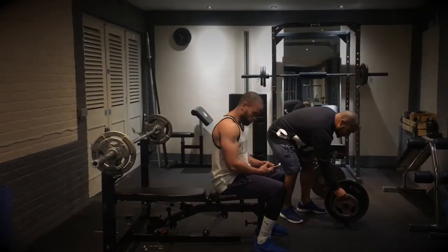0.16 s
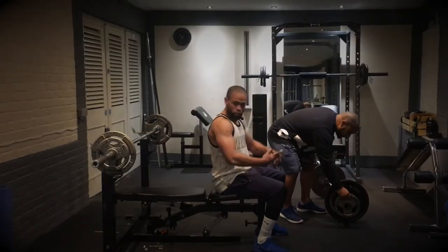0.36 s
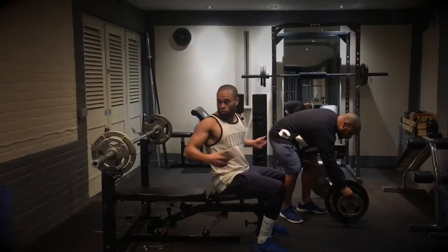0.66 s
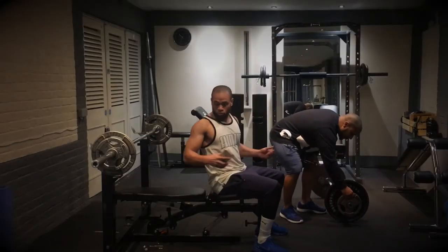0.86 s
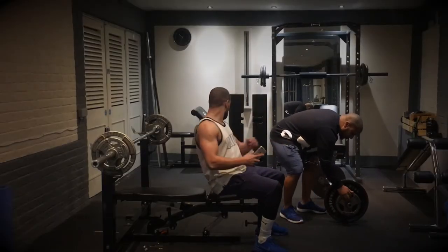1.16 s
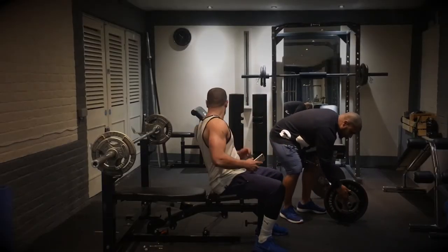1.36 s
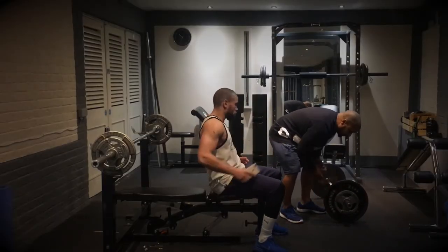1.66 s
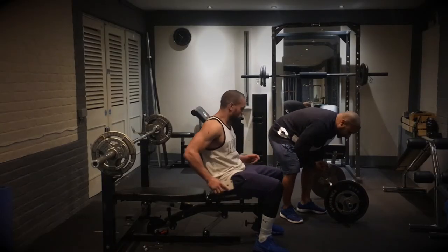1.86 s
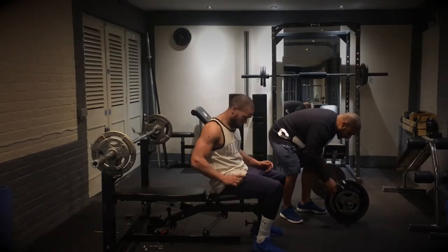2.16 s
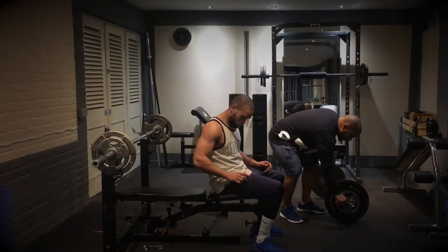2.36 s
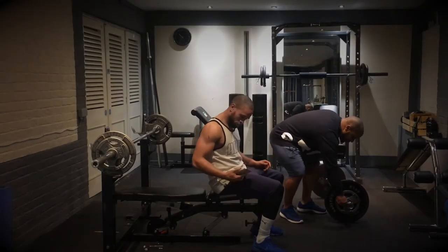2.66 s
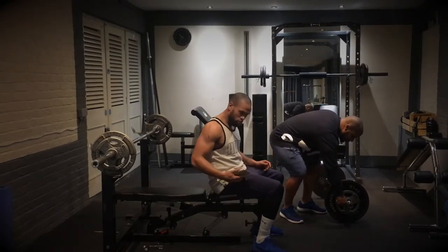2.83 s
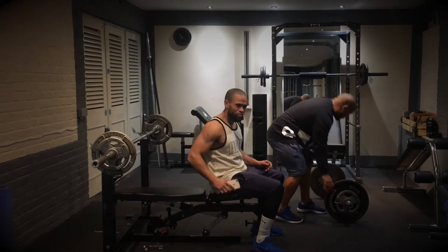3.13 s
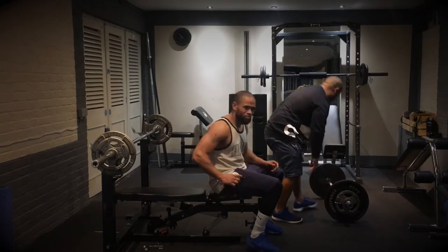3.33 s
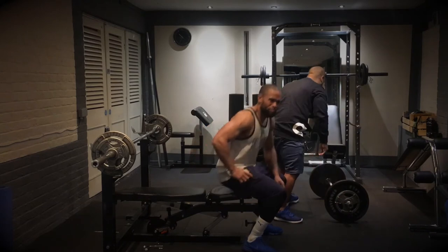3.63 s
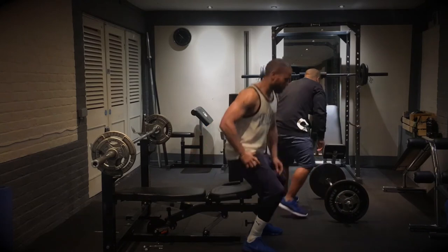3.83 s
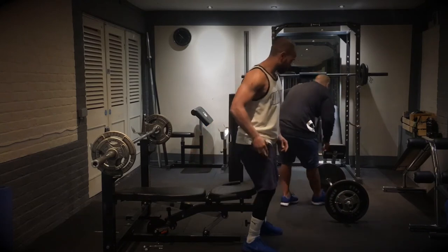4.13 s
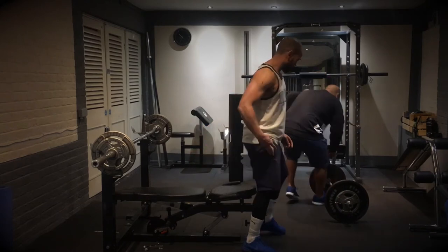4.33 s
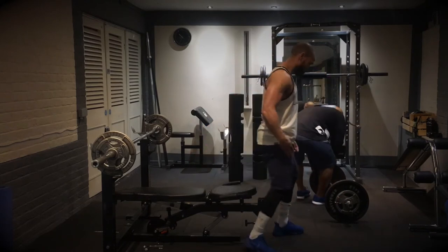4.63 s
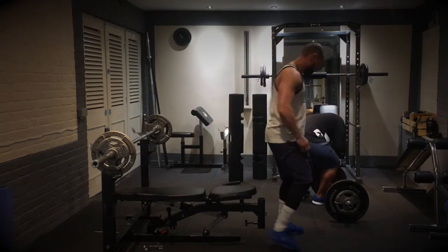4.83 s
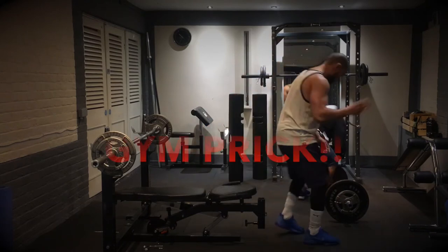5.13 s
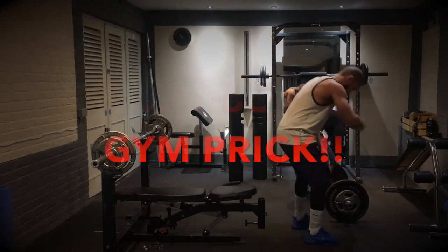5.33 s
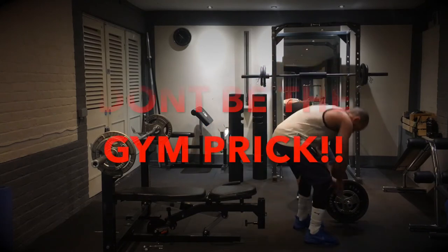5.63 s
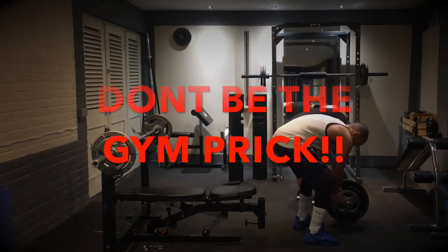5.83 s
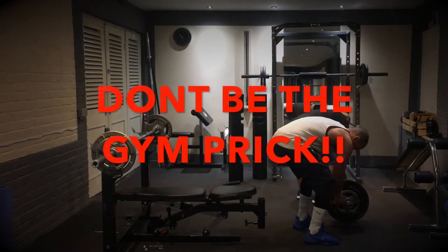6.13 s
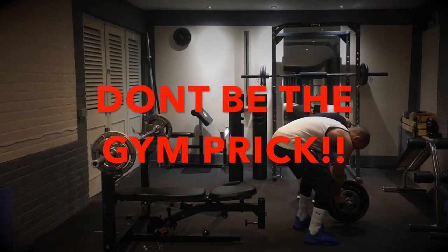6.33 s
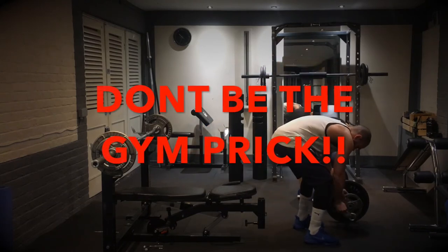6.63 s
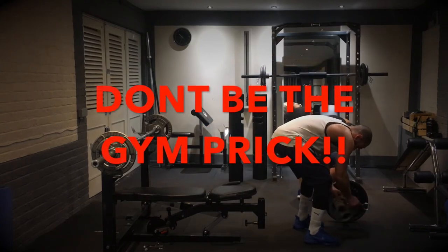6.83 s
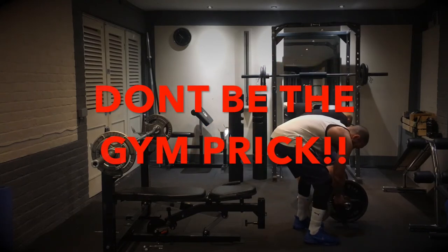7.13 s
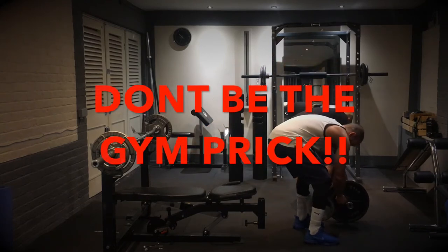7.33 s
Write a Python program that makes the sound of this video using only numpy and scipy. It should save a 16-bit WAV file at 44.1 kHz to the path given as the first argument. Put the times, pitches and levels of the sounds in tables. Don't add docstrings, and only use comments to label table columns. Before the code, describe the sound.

Distant cast-iron clanks in a bright hard-walled room: a knock, a ringing slam, small clicks, scrapes, then a loud ringing clunk over faint ventilation.

```python
import sys
import numpy as np
from scipy import signal
from scipy.fft import rfft, irfft, next_fast_len
from scipy.io import wavfile
from scipy.ndimage import uniform_filter1d

SR = 44100
rng = np.random.default_rng(int(sys.argv[2]) if len(sys.argv) > 2 else 0)


def unload_wav(signal):
    wavfile.write(
        sys.argv[1],
        SR,
        np.round(np.clip(np.atleast_2d(signal).T, -1, 1) * 32767).astype(np.int16),
    )


def boost_factor(decibels):
    exponent = np.asarray(decibels, float) / 20
    return 10 ** exponent


N = 329868
SIZE = 65536

# contacts (time [s], peak level [dB], contact length [s], treble share [dB]),
#   iron modes (frequency [Hz], level [dB], t60 [s]),
#   clatter spectrum (frequency [Hz], density [dB per Hz]),
#   level of ring over clatter [dB]
FIRST_KNOCK = ([(0.3025, -15.5, 0.012, -18)], [(2120, -21.0, 0.33), (2510, -8.5, .1), (2930, -14, 0.1),
                (3620, -14.5, 0.46), (4200, -4, 0.1), (4370, -35, 5.0), (5700, 4.5, 0.58),
                (6150, -5.0, 0.25), (8140, -34, 0.5)] + [(755, -10, 0.084), (1432, -15, 0.11)], [(59, -32),
                (100, -29.5), (229, -10), (406, -18.5), (691, -11.5), (1480, -17), (1680, -16.5),
                (4670, -18), (5650, -17), (16000, -41)], -3.5)
JIGGLE = ([(0.858, -37.5, 0.0092, -27.5), (0.942, -28.5, 0.041, -16.5), (0.9744, -33.5, 0.04, -19)],
           [(784, -10, 0.68), (1420, -15.5, 0.45), (2000, -13.5, 5.0), (2420, 0.5, 0.061), (3597, -14, 2.1),
           (4240, -12.5, 0.39), (6300, -19, 0.498), (7850, -20, 0.34)], [(180, -43), (300, -10.5),
           (624, -7.5), (842, -0.5), (1210, -8.5), (1510, 1.5), (1780, -18), (3580, -7), (4990, -20),
           (6410, -12), (16000, -54)], -9.5)
LIFT = ([(1.307, -32, 0.02, -8.5), (1.3374, -25.5, 0.035, -9.5)], [(1968, -11.5, 5.0), (6920, -9, 5.0),
         (8027, -24.5, 5.0)], [(290, -42), (500, -11.5), (1510, -8.5), (2430, -27), (3750, -11),
         (5310, -17), (16000, -43)], -10.5)
SLAM = ([(1.383, -8, 0.0027, -22), (1.405, -15, 0.0071, -14.5)] + [(1.64, -28.5, 0.039, -24)],
         [(3285, -24.5, 0.49), (3566, -1.0, 0.29), (4030, -21.0, 1.1), (4000, 3.5, 0.16),
         (4400, -21.5, 1.05), (5290, -38.5, 5.0), (6650, -15.5, 0.36),
         (8000, -20, 0.48)] + [(695, -10.5, 0.085), (790.5, 8.5, 0.2), (848, 2.5, 0.29), (1950, -14, 0.11),
         (2330, -20.0, .2)], [(59, -56), (110, -28.5), (280, -27), (634, -25.5), (818, -5.5), (1010, -23),
         (1500, -17), (1700, -25.5), (2170, -32), (2860, -22.5), (3050, -25), (6150, -31), (16000, -55)], -6)
CLIP_ON = ([(2.4897, -31, 0.004, -12)], [(2318, -8, 0.045), (2184, -18, 0.032), (3770, -15, 0.029),
            (4600, -5.5, 0.025), (6550, -4, 0.03), (6626, -4, 0.13), (8260, -4, 0.2), (9280, -5, 0.26)],
            [(350, -48), (600, -22), (1400, -8), (1750, -19.5), (2270, -9), (2720, -11.5), (6550, -15.5),
            (16000, -21.5)], -6)
COLLAR = ([(2.6334, -28, 0.0019, -7), (2.7544, -37.5, 0.0027, -12)], [(3620, -16, 0.033), (6260, -20, 0.67),
           (6200, -13, 0.04), (8100, -20, 5.0), (8390, -5, 0.16), (8950, -15, 0.41), (8900, -22, 0.98),
           (10700, -14, 0.5)], [(350, -33.5), (600, -26), (698, -6.5), (2830, -14.5), (3730, -9.5),
           (8270, -12), (16000, -12.5)], -7)
SETTLE = ([(2.81, -34.5, 0.0028, -8), (2.9502, -44, 0.0048, -13)], [(6050, -9, .03), (6430, -5, 0.08),
           (6700, -6, 0.08), (3590, -10, 0.1), (8100, -2, 0.1)], [(350, -29), (600, -17), (1210, -15),
           (1310, -10), (1850, -25), (3250, -14), (4980, -21), (6000, -12.5), (6600, -11.5), (7300, -18.5),
           (16000, -36)], -7.5)
GRIP = ([(5.02, -52, 0.043, -11), (5.09, -49.5, 0.048, -15), (5.143, -37.5, 0.038, -13.5),
         (5.177, -26, 0.0032, -7), (5.2, -31, 0.072, -24)], [(710, -12, 0.063), (1334, -8, 0.1),
         (1560, -9, 0.048), (2650, -13, 0.14), (3703, 9, 0.025), (4870, 7, 0.033), (5816, 9, 0.028),
         (6250, -11, .1), (6630, -2, .05)], [(290, -20.5), (621, -20), (708, -3.5), (843, -11), (1380, -6),
         (2040, -13.5), (3650, -14), (6700, -14.5), (7400, -16), (16000, -43.5)], -1.66)
SLIDE = ([(5.745, -43, 0.046, -29.5), (5.782, -32, 0.072, -17), (5.81, -31, 0.055, -12),
          (5.85, -26.5, 0.031, -14), (5.885, -34, 0.032, -3.5)], [(3480, -4, 0.1), (5340, 3.5, 0.05),
          (6320, 7.5, 0.05), (1667, -29, 0.037), (7872, -8, 0.05), (8763, -2, 0.05), (9600, -8, 0.2)],
          [(290, -47), (500, -27), (893, -13), (1280, -4.5), (1460, -9.5), (2730, -16), (3390, -3),
          (3750, -13.5), (6330, -6.5), (16000, -27.5)], -7.5)
TIP = ([(6.33, -54, 0.088, -19.5), (6.385, -41, 0.1, -13), (6.41, -38.5, 0.096, -3.5),
        (6.45, -31, 0.015, -8.5)], [(6360, -7, .05), (7880, -2, .05), (4300, -25, .05)], [(590, -16),
        (1000, -0.5), (1940, -9.5), (2620, -7.5), (4410, -2), (4900, -7), (7620, -8.5), (16000, -20.5)],
        -9.5)
ROLL = ([(6.545, -31.5, 0.017, -25), (6.61, -35, 0.081, -16), (6.674, -30.5, 0.0077, -6.5),
         (6.71, -29, 0.039, -31), (6.79, -43.5, 0.094, -36)], [(1960, -22.5, 0.32), (3000, -12, 0.244),
         (2320, -20, 0.069), (5640, -8, 0.2), (6580, -7, 0.48), (9750, 0, 0.08), (11800, 3, 0.16)],
         [(120, -15), (200, 1.5), (836, -0.5), (986, -5.5), (1350, 1), (2700, -14.5), (3070, -3.5),
         (3760, -12.5), (4270, -5), (5130, -15.5), (16000, -26)], -11)
RACK = ([(7.2435, -10.5, 0.0082, -26.5), (7.257, -21, 0.032, -13.5)], [(2230, -19.0, 1.2), (2350, -33, 1.7),
         (3095, -7.5, 5.0), (3450, -10, 1.0), (3590, -18, 0.23), (4330, -1, 0.032)] + [(5827, 6.5, 0.044),
         (6660, 1, .05), (7380, 1.5, .05)], [(76, -33), (150, -22.5), (532, -14), (638, -24), (829, -10),
         (1080, -22), (1490, -11), (1780, -24.5), (2950, -12), (4980, -19.5), (5700, -8.5), (6870, -20),
         (16000, -33)], -8)
FLOOR_DROP = ([(6.449, -36.5, 0.0032, -14), (6.472, -20.5, 0.0042, 1), (6.509, -47, 0.0054, -2)], [],
               [(71, -63), (120, -26), (221, -28), (380, -1.5), (480, -3.5), (693, -5.5), (1040, -16),
               (5500, -120)], 0.1)
STEPS = ([(0.629, -36.5, 0.022, -18), (0.721, -38, 0.031, 5.5), (2.005, -38.5, 0.014, 5),
          (2.06, -50, 0.036, -6), (4.578, -41.5, 0.031, -26.5), (4.629, -44, 0.02, -14.5),
          (5.099, -43, 0.028, -3.5), (5.469, -42, 0.0099, 6), (5.749, -44, 0.011, -13.5)], [], [(65, -36),
          (110, -13), (178, -5.5), (404, -3), (654, -12), (878, -12.5), (1500, -16.5), (1950, -78),
          (3300, -120)], 0.1)
BENCH = ([(3.534, -38.5, 0.0056, 0), (3.575, -51, .006, 0), (3.617, -50, 0.0065, 0),
          (3.655, -49, 0.0051, 0), (3.69, -54.5, 0.0094, 0.0012)], [(281, 0, 0.0433)], [(100, -23),
          (200, -5), (290, -5), (450, -16), (700, -16), (1500, -61)], 0.1)
TICK = ([(0.5994, -53.5, 0.004, -5), (0.6894, -45, 0.0046, 8), (1.8994, -52, 0.0019, 9),
         (5.4884, -46.5, 0.0021, 2), (5.6624, -49, 0.0048, 7), (7.165, -33.5, 0.0034, -45)],
         [(6400, -1, 0.5), (8160, 0, 0.37)], [(590, -42), (1000, -16.5), (1110, -1.5), (3620, -9),
         (4260, -0.5), (4960, -6), (6700, -7.5), (12100, -11.5), (16000, -24.5)], -8.5)

BIG, BIG_1B, BIG_1C, BIG_2, BIG_2B, BIG_3, BIG_3B = 829, 787, 880, 1525, 1511, 2870, 2840
BIG_4, BIG_5, BIG_6 = 4055, 2304, 3575
BAR, BAR_2, BAR_3, BAR_4, BAR_5, BAR_6, BAR_7 = 1968, 2460, 3036, 4205, 2550, 2218, 4330
SMALL, SMALL_2, SMALL_3 = 1289, 1362, 1371
SPRING, SPRING_2, SPRING_3, SPRING_4, SPRING_5, SPRING_6 = 2277, 3720, 8318, 8547, 3176, 4565
SPRING_7, SPRING_8, SPRING_9, SPRING_10, SPRING_11 = 6040, 6288, 6578, 7117, 7962
THIN, THIN_2, THIN_2B, THIN_3, THIN_3B = 2579, 3373, 3421, 5340, 5418
THIN_4, THIN_5, THIN_6 = 6500, 7872, 8763
RIM, RIM_2, RIM_3, SEATED, SEATED_3 = 5400, 5830, 7384, 814, 3072

# (frequency [Hz], level [dB], t60 [s], beat period [s], first beat dip after the strike [s])
EARLY_RINGS = [
    (0.303, [(BIG_2, -34, 2.9, 0.29, 0.22), (SMALL_3, -37, 1, 0.42, 0.32), (BAR_3, -45.5, 1.1, 0.12, .13), (BAR_5, -44.5, 1, 0.23, 0.21), (BAR_6, -47, 0.93, 0.17, .1), (BAR_7, -46, 0.39, 0.12, .15), (BIG_6, -56.5, 1.1, .25, .1)]),
    (0.69, [(THIN_4, -67, 0.68, 0.16, 0.18)]),
    (0.86, [(BAR, -54.5, 2.6, 0.2, 0.15)]),
    (0.96, [(BAR_2, -58.5, 1.4, .2, .1), (BIG_6, -56.5, 0.98, 0.17, .08), (BAR_7, -52, 0.48, 0.23, .1)]),
    (1.382, [(BIG, -21.5, 1.7, 0.36, 0.23), (BIG_1B, -28, 0.7, 1, 0.15), (BIG_1C, -33.5, 0.71, 0.64, 0.15), (BAR, -43, 1.8, 0.3, 0.19), (BIG_2B, -32.5, 0.73, 0.41, 0.3), (BIG_2, -29, 1.95, 0.69, 0.55), (BAR_2, -49, 1.8, 0.34, 0.12), (BIG_3, -28.5, 1.64, .3, 0.27), (BIG_3B, -38.5, 0.86, 1.8, .8), (BIG_4, -40.5, 0.9, 0.25, 0.14), (SMALL, -33.5, 2.2, 0.57, 0.2), (BIG_5, -52.5, 1.5, .3, .1), (BIG_6, -46.5, 1.1, 0.34, .2)]),
    (1.55, [(SEATED, -33, 0.99, 0.169, .001)]),
    (1.7, [(BIG, -36, 1.7, 0.29, 0.01)]),
]
LATE_RINGS = [(2.491, [(SPRING, -62, 0.79, .3, 0.087), (SPRING_2, -59.5, .4, 0.27, .15),
              (SPRING_6, -53, .25, 0.19, 0.087), (SPRING_8, -63, .4, 0.13, 0.042),
              (SPRING_9, -63, .3, .15, 0.09), (SPRING_10, -55, .35, .2, .1)]),
              (2.634, [(SPRING_2, -51, 0.45, 0.1, 0.12), (SPRING_7, -60, 0.76, .15, 0.061),
              (SPRING_11, -63, .35, .2, .1), (THIN_3B, -67, .6, .2, .1), (SPRING_3, -49, 0.37, .3, 0.13),
              (SPRING_4, -49, 0.33, .3, .15)]), (2.821, [(SMALL, -44, 0.62, 0.27, 0.001)]),
              (2.811, [(SPRING_9, -60, .6, .15, 0.074), (THIN_3B, -67, .5, .2, 0.091),
              (SPRING_5, -64, .4, .3, .15), (SPRING_3, -57, 0.6, .3, 0.21)]),
              (2.95, [(SPRING_5, -56.5, 0.32, 0.31, 0.29)]), (5.18, [(SMALL_2, -52.5, 0.64, 0.094, .11),
              (SPRING_2, -52, 0.7, .12, 0.086)]), (5.492, [(SMALL_2, -49.5, 0.87, 0.097, 0.09)]),
              (5.79, [(THIN_3B, -53, .9, .2, .01)]), (5.815, [(THIN_2, -52, 1, 0.27, 0.22),
              (THIN_2B, -46, 0.66, 0.23, 0.24)]), (5.885, [(SMALL, -43.5, 0.9, 0.12, 0.15)]),
              (5.849, [(THIN, -54.5, .8, 0.24, 0.22), (THIN_3, -49, .5, .3, .15),
              (THIN_3B, -50, 0.66, 0.28, 0.23), (THIN_4, -52, 0.72, .9, .5)]),
              (5.885, [(THIN_5, -46, 0.46, 0.27, 0.17), (THIN_6, -48, 0.57, .12, 0.084)]),
              (6.67, [(BAR, -57, 2, 0.82, 0.35), (BAR_4, -44, 0.45, 0.16, .07), (BAR_3, -53, 1, 0.32, 0.27),
              (SMALL_3, -53.5, 1.26, 0.34, .01), (BIG_2, -49, 0.95, 0.195, 0.643)]),
              (7.25, [(SEATED, -22.5, 4, 0.46, 0.38), (BIG_2, -23.5, 3.7, 0.58, 0.45),
              (RIM, -27, 0.17, .3, 0.1), (RIM_2, -32, 0.28, 0.37, 0.11), (RIM_3, -41, 0.45, 0.28, .15),
              (SEATED_3, -43, 1.2, 0.046, 0.03)]), (7.445, [(BIG, -32.5, 3, 0.17, .001)])]
# (time [s], rate [dB per s], total [dB], highest partial [Hz])
GRABS = [(0.68, 90, 10, 1600), (1.485, 300, 8.5, 3000), (1.486, 298.5, 3.5, 1000), (1.92, 109, 13.5, 1000),
         (2.2, 68, 30, 3000), (7.365, 413, 24, 1600)]
# (time [s], length [s], from [Hz], to [Hz], level [dB])
SQUEALS = [
    (5.777, 0.0835, 1337, 1720, -49),
    (5.852, 0.048, 1080, 1260, -55),
]
# (middle time [s], level [dB], half length [s])
SHUFFLE = [(1.976, -62.5, 0.24), (2.272, -72.5, 0.095), (3.152, -65.5, 0.071), (3.363, -66, 0.14),
           (3.79, -67, 0.16), (4.366, -70, 0.087), (4.703, -72.5, 0.23), (5.04, -69.5, 0.086)]
# (frequency [Hz], density [dB per Hz])
RUSTLE = [(800, -120), (1500, -1), (3000, 1.5), (6000, -7.5), (12000, -24.5), (16000, -13)]
# (frequency [Hz], density [dB per Hz])
AIR = [(21, -38.5), (35, -7.5), (133, -2.5), (334, -3), (819, -4.5), (1400, -11), (2870, -23.5),
       (9100, -34.5), (16000, -40.5)]
# (frequency [Hz], width [Hz], level [dB])
HUM = [(136.3, 17, -64), (392, 2.5, -66.5), (50.7, 18, -68.5)]
# (frequency [Hz], t60 [s])
ROOM = [(100, 1), (500, 0.68), (2000, 1), (6000, 0.72), (12000, 0.44), (16000, 0.348)]
# (frequency [Hz], width [Hz], level [dB])
MIC = [(4880, 207, -8), (15900, 900, -4.5), (10470, 430, -3.5)]


def unit(x):
    return x / np.sqrt(np.mean(x ** 2) + 1e-20)


def along(points, hz):
    f, v = np.transpose(points)
    return np.interp(np.log(hz + 1), np.log(f + 1), v)


def coloured(gain):
    m = next_fast_len(N + 8192)
    spectrum = rfft(rng.standard_normal(m)) * gain(np.fft.rfftfreq(m, 1 / SR))
    return unit(irfft(spectrum, m)[:N])


def causal(curve):
    gain = boost_factor(along(curve, np.fft.rfftfreq(SIZE, 1 / SR)))
    cepstrum = irfft(np.log(gain + 1e-6))
    cepstrum[1:SIZE // 2] *= 2
    cepstrum[SIZE // 2 + 1:] = 0
    return unit(irfft(np.exp(rfft(cepstrum)))) / np.sqrt(SIZE)


def contacts(hits, modes, clatter, ring_db):
    out = np.zeros(N + SIZE)
    t = np.arange(SIZE // 4) / SR
    f = np.fft.rfftfreq(SIZE, 1 / SR)
    body = rfft(causal(clatter))
    usual_db = np.mean([hit[3] for hit in hits])
    for s, db, length, treble_db in hits:
        u = t / np.clip(length, 0.001, 0.09)
        uneven = boost_factor(4.54 * rng.standard_normal(len(u)))
        burst = u * np.exp(-3 * u) * rng.standard_normal(len(u)) * uneven
        burst /= np.linalg.norm(burst)
        ring = iron_ring(modes, t) * (1 - np.exp(-u ** 2))
        ring /= np.linalg.norm(ring) + 1e-9
        dry = rfft(burst, SIZE) * body + boost_factor(ring_db) * rfft(ring, SIZE)
        tilt = np.clip(treble_db - usual_db, -12, 12) / 14
        hardness = (1j * (f + 1000) / 3000) ** tilt
        wet = irfft(dry * hardness * rfft(room(), SIZE))
        loudest = np.sqrt(uniform_filter1d(wet ** 2, size=600).max())
        out[round(s * SR) - 60:][:SIZE] += boost_factor(db - 8) * wet / loudest
    return out[:N]


def iron_ring(modes, t):
    ring = np.zeros(len(t))
    for hz, mode_db, t60 in modes:
        level_db = mode_db + rng.normal(0, 2.8)
        fade = boost_factor(level_db - 60 * t / np.clip(t60, 0.02, 190 / hz))
        ring += fade * np.sin(2 * np.pi * hz * t)
    return ring


def room():
    hz, t, z = signal.stft(rng.standard_normal(SR), SR, nperseg=256)
    fade = boost_factor(-60 * t / along(ROOM, hz)[:, None])
    tail = signal.istft(z * fade, SR, nperseg=256)[1][:SR]
    t = np.arange(SR) / SR
    tail *= (1 - np.exp(-t / 0.00065)) * (1 + 0.5 * np.exp(-t / 0.17))
    tail /= np.linalg.norm(tail)
    tail[0] = boost_factor(-11)
    return tail


def ticks():
    hits, modes, clatter, ring_db = TICK
    bright = [(s, db, length, -body_db) for s, db, length, body_db in hits]
    return contacts(bright, modes, clatter, ring_db)


def hand_damping(s, u, hz):
    loss = 0
    for held, rate_db, most_db, top_hz in GRABS:
        if s < held and hz < top_hz:
            loss = loss + np.clip(rate_db * (s + u - held), 0, most_db)
    return loss


def free_ringing():
    ring_s, build_s = 1.3, 0.0013
    partner = 0.75
    flutter_db = 3
    out = np.zeros(N + 2 * SR)
    u = np.arange(round(ring_s * SR)) / SR
    for s, partials in EARLY_RINGS + LATE_RINGS:
        for hz, db, t60, beat_s, dip_s in partials:
            drift = np.interp(u * 40, np.arange(90), rng.standard_normal(90))
            flutter = np.interp(u * 40, np.arange(90), rng.standard_normal(90))
            beat = np.cos(2 * np.pi * (u - dip_s) / beat_s)
            pair = np.sqrt(1 + partner ** 2 - 2 * partner * beat)
            fade = boost_factor(db - 60 * u / t60 - hand_damping(s, u, hz) + flutter_db * flutter)
            fade *= 1 - np.exp(-u / build_s)
            tone = np.sqrt(2) * np.sin(2 * np.pi * hz * u + 0.59 * drift)
            out[round(s * SR):][:len(u)] += fade * pair * tone
    return out[:N]


def squeals():
    out, t = np.zeros(N), np.arange(N) / SR
    for s, length, from_hz, to_hz, db in SQUEALS:
        u = np.clip((t - s) / length, 0, 1)
        shake = np.interp(u, np.linspace(0, 1, 9), rng.standard_normal(9))
        hz = (from_hz + (to_hz - from_hz) * u) * (1 + 0.0081 * shake)
        swell = boost_factor(db + 3.4 * shake) * np.sin(np.pi * u)
        out += swell * np.sqrt(2) * np.sin(2 * np.pi * np.cumsum(hz) / SR)
    return out


def shuffle():
    t = np.arange(N) / SR
    moves = sum(boost_factor(db) * np.exp(-((t - s) / half) ** 2) for s, db, half in SHUFFLE)
    return moves * coloured(lambda hz: boost_factor(along(RUSTLE, hz)))


def ventilation():
    out = boost_factor(-57.5) * coloured(lambda f: boost_factor(along(AIR, f)))
    for hz, width, db in HUM:
        out += boost_factor(db) * coloured(lambda f: 1 / (1 + ((f - hz) / width * 2) ** 2))
    return out


def scene():
    iron = FIRST_KNOCK, JIGGLE, LIFT, SLAM, CLIP_ON, COLLAR, SETTLE, GRIP, SLIDE, TIP, ROLL, RACK
    floor = FLOOR_DROP, STEPS, BENCH
    knocks = sum(contacts(*part) for part in iron + floor)
    mix = knocks + ticks() + free_ringing() + squeals() + shuffle() + ventilation()
    return mix[None]


def top_cut(x):
    return signal.sosfilt(signal.butter(12, 16540, fs=SR, output="sos"), x)


def record(dry):
    m = next_fast_len(N + 8192)
    f = np.fft.rfftfreq(m, 1 / SR)
    dips_db = sum(db / (1 + ((f - hz) / width * 2) ** 2) for hz, width, db in MIC)
    colour = boost_factor(dips_db) * (f < 16050)
    x = irfft(rfft(dry, m) * colour, m)[:, :N]
    x = x / (1 + np.abs(x / 0.56) ** 5) ** (1 / 5)
    return top_cut(x)


dry = scene()
out = record(dry)
unload_wav(out)
```